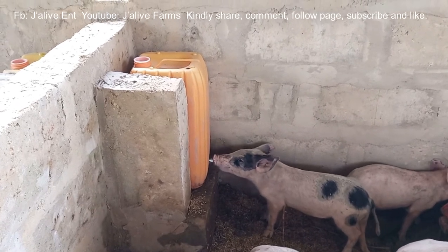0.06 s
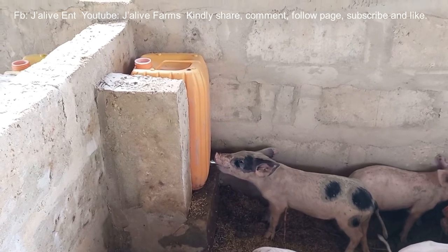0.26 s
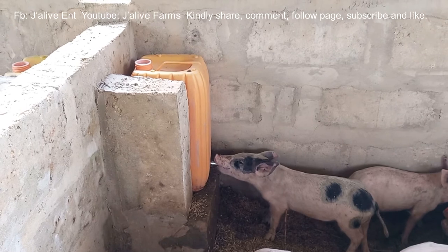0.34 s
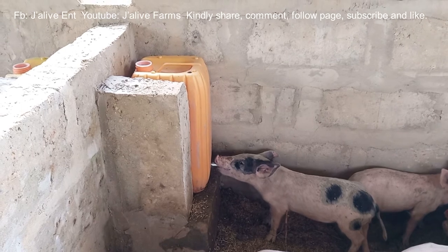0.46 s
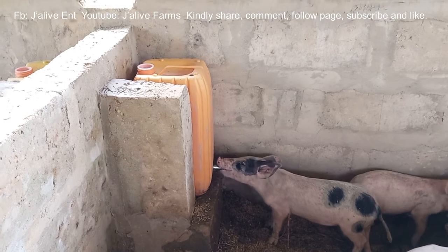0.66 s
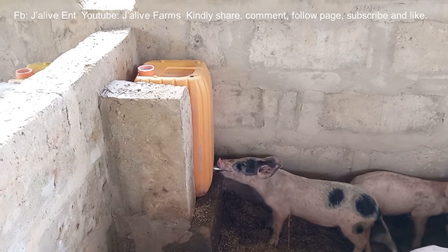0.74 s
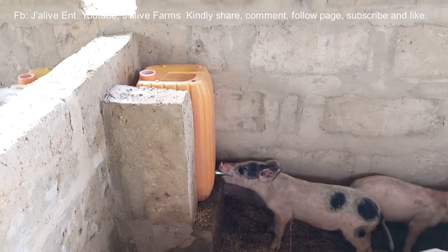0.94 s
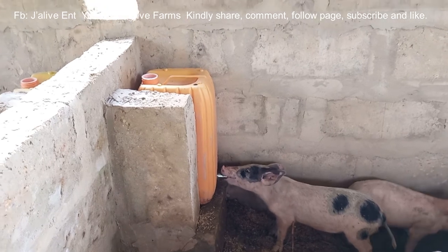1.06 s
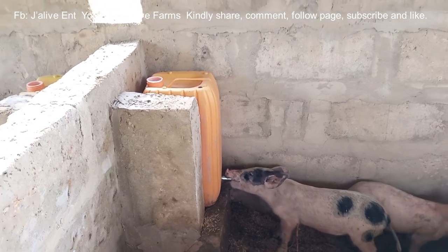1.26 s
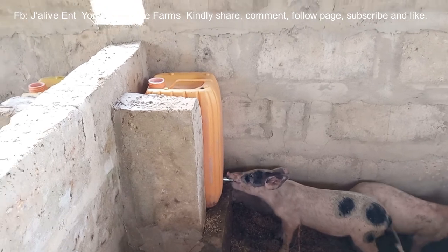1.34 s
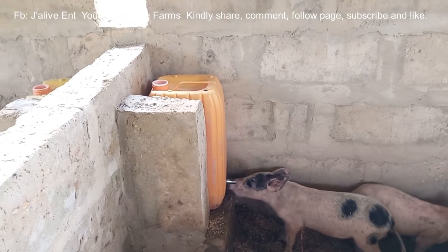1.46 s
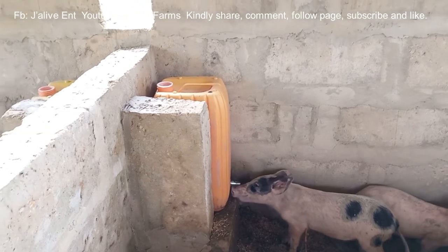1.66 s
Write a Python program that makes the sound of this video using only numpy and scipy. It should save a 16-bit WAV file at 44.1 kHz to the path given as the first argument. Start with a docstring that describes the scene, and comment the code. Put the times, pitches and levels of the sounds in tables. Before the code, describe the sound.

Pigs grunting and giving two harsh squeals, with faint wet hisses from a drinker.

```python
"""Pigs at a drinker in a small concrete pen, heard close on one small microphone, in quiet outdoor air.
Gruff throat grunts and closed-mouth hums come first, with a thin squeak and wet hisses from the drinker.
Two harsh squeals follow, near 0.45 s and 1.15 s, with more grunts and hisses around them. Each starts as
a rattling rasp of flapping throat tissue, breaks into a thinner falling tone of the vocal folds and ends
with a quick drop. The bare walls add a brief echo throughout."""
import sys
import numpy as np
from scipy import signal
from scipy.fft import rfft, irfft
from scipy.io import wavfile
from scipy.ndimage import uniform_filter1d

SR = 44100
rng = np.random.default_rng(int(sys.argv[2]) if len(sys.argv) > 2 else 0)


def bounce(signal):
    """Save signal as a 16-bit WAV file at the path given by the first command-line argument."""
    frames = np.transpose(np.atleast_2d(signal))
    limited = np.clip(frames, -1, 1)
    pcm = np.round(limited * 32767).astype(np.int16)
    wavfile.write(sys.argv[1], SR, pcm)


N = 74970


def undb(db):
    return 10 ** (np.asarray(db) / 20)


def clock():
    return np.arange(N) / SR


def noise():
    return rng.standard_normal(N)


def walk(rate_hz):
    """Smooth random wander with a spread of 1."""
    width = max(int(SR / rate_hz), 1)
    wander = uniform_filter1d(uniform_filter1d(noise(), width, mode="wrap"), width, mode="wrap")
    return wander / wander.std()


def curves(rows):
    """The columns of a control table over time, and a gate that is open while it lasts."""
    rows, t = np.array(rows, float), clock()
    gate = np.clip(np.minimum(t - rows[0, 0], rows[-1, 0] - t) / 0.0038 + 1, 0, 1)
    return [np.interp(t, rows[:, 0], column) for column in rows.T[1:]], gate


def response(hz, shape):
    """Gain at the given frequencies of a shape with columns freq_hz, gain_db."""
    freq_hz, gain_db = np.array(shape, float).T
    return undb(np.interp(np.log(hz + 1), np.log(freq_hz), gain_db))


def colour(x, shape, size=4096):
    """Minimum-phase filter of unit energy: the gains of the shape count only relative to each other."""
    cepstrum = irfft(np.log(response(np.arange(size // 2 + 1) * SR / size, shape)))
    cepstrum[1:size // 2] *= 2
    cepstrum[size // 2 + 1:] = 0
    impulse = irfft(np.exp(rfft(cepstrum)))
    return signal.fftconvolve(x, impulse / np.linalg.norm(impulse))[:N]


def ring(x, hz, q):
    """One resonance, gain 1 at its centre."""
    return signal.lfilter(*signal.iirpeak(hz, q, fs=SR), x)


def scatter(x, decay_s=0.0032, size=1024):
    """Spreads each slap over a few milliseconds and keeps its colour."""
    burst = rfft(rng.standard_normal(size) * np.exp(-np.arange(size) / SR / decay_s), 2 * size)
    burst /= np.sqrt(uniform_filter1d(np.abs(burst) ** 2, size=14))
    return signal.fftconvolve(x, irfft(burst)[:size])[:N]


def flaps(start_s, rate_hz, rough, jitter=0.11, shimmer_db=6.5):
    """Slaps of throat tissue and the puffs of air between them; roughness makes them uneven and airy."""
    rough = np.clip(rough, 0, 1)
    pulses, puff, at_s = np.zeros(N), np.zeros(N), max(start_s, 0)
    for late, loud in rng.standard_normal((200, 2)):
        i = int(at_s * SR)
        if i >= N:
            break
        period_s = np.exp(jitter * rough[i] * late) / rate_hz[i]
        strength = undb(shimmer_db * rough[i] * loud)
        pulses[i] = strength * np.sqrt(period_s * SR)
        cycles = np.arange(min(int(2 * period_s * SR), N - i)) / (period_s * SR)
        puff[i:i + len(cycles)] = strength * np.exp(-cycles) * np.sqrt(2)
        at_s += period_s
    breath = np.sqrt(rough) * noise() * np.sqrt((1 - rough) * puff ** 2 + rough)
    return np.sqrt(1 - rough) * pulses, breath


def outdoor_air(level_db=-77.5):
    """A faint, steady rush around the pen, strongest in the bass."""
    # spectrum of the air: freq_hz, gain_db
    spectrum = [(20, -19), (55, 5), (120, -2.5), (300, -11), (700, -15.5), (1500, -23.5), (4500, -19),
                (7000, -26), (8800, -37), (15000, -41.5)]
    return undb(level_db) * colour(noise(), spectrum)


def grunts(release_s=0.024, roughness=0.49, throat_db=4.5, snout_db=9, q=7.7):
    """Short bursts of uneven flaps through a dark throat and a hollow snout."""
    # grunts: start_s, swell_s, hold_s, drive_db, flap_rate_hz, throat_hz, snout_hz
    calls = [(-.02, 0.0067, 0.024, -58, 88, 254, 615), (0.191, 0.004, 0.062, -52.5, 72, 428, 584),
             (0.287, .005, 0.012, -45.5, 68, 290, 834), (0.316, 0.0045, 0.011, -49, 52, 170, 494),
             (.603, 0.00404, 0.011, -51, 41.6, 274, 603), (0.641, 0.0055, 0.021, -53.5, 65, 222, 797),
             (0.939, 0.0081, 0.031, -64, 88, 302, 468), (0.975, 0.0018, 0.02, -56, 101, 275, 772)]
    # the grunting throat: freq_hz, gain_db
    throat_shape = [(30, -33), (80, -18), (140, 5), (230, 1), (350, -2), (550, -6.5), (780, -7),
                    (950, -19.5), (1350, -14), (2000, -26.5), (4300, -28.5), (6500, -32.5), (9500, -62.5)]
    sound = np.zeros(N)
    for start_s, swell_s, hold_s, drive_db, rate_hz, throat_hz, snout_hz in calls:
        age = clock() - start_s
        effort = np.clip(age / swell_s, 0, 1) * np.exp(-np.maximum(age - swell_s - hold_s, 0) / release_s)
        pulses, breath = flaps(start_s + swell_s, np.full(N, rate_hz), np.full(N, roughness))
        voice = colour(undb(drive_db) * effort * (scatter(pulses) + breath), throat_shape)
        throat = undb(throat_db) * ring(voice, throat_hz, q)
        snout = undb(snout_db) * ring(voice, snout_hz, q)
        sound += (voice + throat + snout) / 2
    return sound


def hums(pitch_hz=136, sag_hz_per_s=96, octave_db=-19):
    """Soft low grunts with the mouth shut, sagging in pitch."""
    # closed-mouth hums: start_s, length_s, level_db
    calls = [(-.01, 0.045, -58.5), (0.035, 0.064, -66), (0.311, 0.086, -61.5), (0.736, 0.109, -60),
             (0.988, 0.11, -63.5), (1.066, 0.067, -71)]
    sound = np.zeros(N)
    for start_s, length_s, level_db in calls:
        age = np.clip(clock() - start_s, 0, length_s)
        hz = (pitch_hz - sag_hz_per_s * age) * (1 + 0.059 * walk(37))
        phase = 2 * np.pi * np.cumsum(hz) / SR
        swell = undb(level_db) * np.sqrt(2) * np.sin(np.pi * age / length_s) ** 2
        sound += swell * (np.sin(phase) + undb(octave_db) * np.sin(2 * phase))
    return sound


def squeak(rise_hz_per_s=460, blur_rad=0.68, brighten=0.22):
    """A thin, hoarse vibration, higher than the squeals, that rises a little and brightens as it swells."""
    # the squeak: start_s, swell_s, fade_s, pitch_hz, level_db
    calls = [(0.041, 0.036, 0.038, 1054, -77.5)]
    # weight of its harmonics: freq_hz, gain_db
    spectrum = [(1100, 0), (2250, -4), (3400, 0), (4550, -0.5), (5700, -24), (6800, -24), (8000, -36)]
    start_s, swell_s, fade_s, pitch_hz, level_db = calls[0]
    age = np.clip(clock() - start_s, 0, swell_s + fade_s)
    ramp = np.clip(np.minimum(age / swell_s, (swell_s + fade_s - age) / fade_s), 0, 1)
    effort = np.sin(np.pi / 2 * ramp)
    phase = 2 * np.pi * np.cumsum(pitch_hz + rise_hz_per_s * age) / SR + blur_rad * walk(310)
    sound = np.zeros(N)
    for k in range(1, 8):
        gain = response(k * pitch_hz, spectrum) * effort ** (1 + brighten * k * k)
        sound += gain * undb(2 * walk(230)) * np.sin(k * phase)
    return undb(level_db) * sound


def drinker_hisses(rise_s=0.0022, relative_width=0.52, grain_db=5, top_hz=7600):
    """Grainy spurts of water and air that die away."""
    # spurts at the drinker: peak_s, level_db, centre_hz, decay_s
    spurts = [(0.182, -63.5, 1320, 0.062), (0.22, -63, 3610, 0.011), (0.314, -66, 2830, 0.05),
              (0.33, -61.5, 4600, 0.019), (0.938, -71, 1130, 0.0046), (1.245, -53, 1456, 0.0015),
              (1.447, -50.5, 3220, 0.0019), (1.569, -58, 4475, 0.0047), (1.681, -70, 5400, 0.03)]
    hz = np.geomspace(100, 16000, 40)
    rolloff_db = -20 * np.log10(1 + (hz / top_hz) ** 20)
    sound = np.zeros(N)
    for peak_s, level_db, centre_hz, decay_s in spurts:
        age = clock() - peak_s
        flow = np.exp(np.minimum(age / rise_s, -age / decay_s)) * undb(grain_db * walk(380))
        band_db = -20 * np.log10(1 + ((hz / centre_hz - centre_hz / hz) / relative_width) ** 2)
        sound += colour(undb(level_db) * flow * noise(), np.column_stack([hz, band_db + rolloff_db]))
    return sound


def squeal_tones(waver=0.003, flutter=0.006, fray_db=3.5, fray_rad=0.25, flicker_db=4.5):
    """Fluttering folds whose period doubles under strain, adding lines halfway between the harmonics."""
    # the folds, one list per squeal: time_s, pitch_hz, fundamental_db, octave_below_db, overtones_db
    calls = [
        [(.432, 679.4, -100, -84, -100), (.458, 683, -88, -50, -72.5), (.495, 666, -90, -48.5, -61),
         (.55, 612.8, -81, -62.5, -51.5), (.58, 636.3, -64, -62, -55.5), (.614, 631, -72, -56, -50.5),
         (.632, 611, -65, -70, -59), (.676, 598.4, -63, -93, -65.5), (.708, 601.5, -70.5, -92, -57.5),
         (.735, 534.4, -56, -71, -70.5), (.79, 493, -59, -103, -71), (.818, 531, -60, -80, -70),
         (.831, 370, -49.5, -95, -96), (.85, 340, -91, -100, -100)],
        [(1.143, 687.8, -100, -96.5, -100), (1.161, 667.5, -102, -46.5, -80.5), (1.215, 652.5, -63.5, -62, -67),
         (1.238, 551.6, -49.5, -50.5, -68), (1.272, 566, -53, -48, -57.5), (1.288, 574, -69, -56, -67),
         (1.3, 742, -58, -60.5, -62), (1.338, 740.2, -73, -47, -51.5), (1.368, 780.3, -54.5, -54, -57.5),
         (1.395, 753.5, -63.5, -66.5, -62), (1.43, 709.4, -65, -61.5, -65.5), (1.475, 703.8, -68, -101, -67.5),
         (1.53, 687.4, -71.5, -105, -74.5), (1.59, 607.3, -63.5, -89, -71), (1.636, 629, -72.5, -83, -80.5),
         (1.651, 481.6, -59, -59.5, -80), (1.669, 380, -55.5, -87, -91), (1.7, 323, -80, -89, -90)],
    ]
    # mouth shape, one list per squeal: freq_hz, gain_db
    mouths = [
        [(600, -29), (920, 13), (1220, 3), (1540, 3), (1850, -14.5), (2420, 7.5), (2850, 7.5), (3120, 2.5),
         (3700, -4.5), (4400, -11), (4900, 4.5), (5350, -4.5), (6000, 6), (6600, -1.5), (7400, -6), (8400, -42)],
        [(600, -10), (850, 12), (1110, 13.5), (1200, 4.5), (1480, -3.5), (1850, -12), (2250, 9.5), (2600, 7),
         (2950, -15), (3330, 4.5), (3750, -1), (4200, -21), (4630, 10.5), (5200, -19), (5700, 7), (6400, -4),
         (7400, -9.5), (8400, -39.5)],
    ]
    # overtones are clear at a squeal's height and hoarse as it fades: time_s, blur_rad_per_harmonic
    hoarseness = [(.5, .12), (.6, .08), (.65, .2), (.7, .14), (.8, .3), (1.25, .2), (1.31, .06), (1.38, .1),
                  (1.46, .45)]
    # brightness of the overtones: time_s, tilt_db_per_octave
    brightness = [(.5, -2.5), (.6, 4), (.68, -4), (1.27, -0.5), (1.32, -0.5), (1.37, 4.5), (1.5, -7)]
    (hoarse_rad,), _ = curves(hoarseness)
    (tilt_db,), _ = curves(brightness)
    sound = np.zeros(N)
    for call, mouth in zip(calls, mouths):
        (pitch_hz, fundamental_db, under_db, overtones_db), gate = curves(call)
        hz = pitch_hz * (1 + waver * walk(96) + flutter * walk(940))
        phase = 2 * np.pi * np.cumsum(hz) / SR
        fundamental = undb(fundamental_db + fray_db * walk(190)) * np.sin(phase + fray_rad * walk(230))
        undertone = undb(under_db + 1.4 * walk(200)) * np.sin(phase / 2)
        half_line_gain = undb(0.5) * undb(under_db) / (undb(under_db) + undb(fundamental_db))
        overtones, power = 0, 0
        for k in np.arange(1.5, 12, 0.5):
            gain = response(k * hz, mouth) * undb(tilt_db * np.log2(k)) * (half_line_gain if k % 1 else 1)
            blur = hoarse_rad * (k - 1) * walk(560) + 2 * np.pi * rng.random()
            overtones += gain * undb(flicker_db * walk(100)) * np.sin(k * phase + blur)
            power += gain ** 2
        overtones *= undb(overtones_db) / np.sqrt(power)
        sound += np.sqrt(2) * gate * (fundamental + undertone + overtones)
    return sound


def squeal_rasps():
    """The harsh part of each squeal: flaps ring chest, mouth and the high snout resonances."""
    # the rasp, one list per squeal: time_s, flap_rate_hz, chest_db, mouth_db, snout_db, roughness
    calls = [
        [(.453, 89.2, -83.5, -82, -76, 0), (.465, 83.4, -56, -54.5, -61.5, 0.11),
         (.479, 86.5, -57, -53, -57.5, 0.08), (.489, 111, -40, -45, -52.5, 0.11),
         (.503, 100.3, -46.5, -50.5, -47, 0.03), (.516, 65.2, -43, -48.5, -44, .6),
         (.55, 110, -47.5, -52, -48, 0.8), (.605, 87, -62.5, -64, -50.5, 0.43),
         (.645, 115, -60, -102, -82, 1.08), (.72, 96, -68.5, -68, -70, 0.6), (.82, 165, -78, -76, -75.5, 0.6),
         (.86, 240, -75, -100, -103, 0.2)],
        [(1.148, 73.4, -81, -102, -86, 0.36), (1.16, 72.2, -55, -70, -69, 0.18),
         (1.212, 105, -47.5, -62, -73, 0.33), (1.221, 75, -43.5, -59.5, -61, 0.29),
         (1.238, 103.6, -41.5, -62, -48, 0.63), (1.264, 142, -52, -58, -55.5, 0.71),
         (1.295, 84.6, -53.5, -62, -64.5, 0.35), (1.35, 77, -76, -92, -70.5, 0.67),
         (1.42, 105, -65.5, -69, -60.5, 0.42), (1.48, 138, -79.5, -78, -81, 0.72),
         (1.6, 107, -77.5, -91, -81.5, 0.87), (1.7, 136, -70.5, -99, -76, 0.37)],
    ]
    # chest resonances: freq_hz, gain_db
    chest_shape = [(30, -29), (80, -20.5), (150, -9), (220, -12), (330, 2.5), (450, -12.5), (560, -9.5),
                   (720, -29.5), (1100, -19), (2500, -83.5)]
    # mouth resonances: freq_hz, gain_db
    mouth_shape = [(300, -55), (740, -18.5), (900, 9.5), (1020, 7.5), (1180, 4), (1380, -16), (1800, -28.5),
                   (4000, -66.5)]
    # high snout resonances, one list per squeal: freq_hz, gain_db
    snout_shapes = [
        [(900, -53.5), (1750, -28), (2050, -3.5), (2400, -11), (2850, 4), (3200, -18), (3650, 1.5), (4050, -1),
         (4400, -6), (4780, 5.5), (5250, -7), (5600, 1.5), (6300, -1.5), (6950, -20.5), (7550, -13),
         (8300, -32.5), (9500, -67)],
        [(900, -37), (1400, -17.5), (1850, -13), (2250, -9), (2600, -0.5), (3000, -17.5), (3400, -3),
         (3800, -3.5), (4600, 2), (5100, -8.5), (5650, -1.5), (6400, -12.5), (7000, -19.5), (7700, -12),
         (8400, -44.5), (9500, -53.5)],
    ]
    sound = np.zeros(N)
    for call, snout_shape in zip(calls, snout_shapes):
        (rate_hz, chest_db, mouth_db, snout_db, roughness), gate = curves(call)
        pulses, breath = flaps(call[0][0], rate_hz, roughness)
        drive, snout_gain = gate * (pulses + breath), gate * undb(snout_db)
        sound += colour(drive * undb(chest_db), chest_shape)
        sound += colour(drive * undb(mouth_db), mouth_shape)
        sound += colour(scatter(snout_gain * pulses) + snout_gain * breath, snout_shape)
    return sound


def hard_slaps(rise_s=0.00028, decay_s=0.0013):
    """The hardest flaps, where a squeal breaks out, bite through the high snout resonances."""
    # single hard flaps: peak_s, level_db
    hits = [(0.468, -45), (0.4898, -32.5), (0.4989, -26), (0.5087, -33.5), (1.2194, -43.5), (1.2375, -39)]
    # snout resonances they ring: freq_hz, gain_db
    snout_shape = [(1800, -31.5), (2800, -9), (3150, -27.5), (3600, -1), (4050, 4), (4350, -10), (4770, 5),
                   (5280, -16), (5570, -1), (5850, -9.5), (6250, -11.5), (8000, -26.5), (10500, -71)]
    force = np.zeros(N)
    for peak_s, level_db in hits:
        age = clock() - peak_s
        force += undb(level_db) * np.exp(np.minimum(age / rise_s, -age / decay_s))
    return colour(force * noise(), snout_shape)


def drinker_tick(peak_s=1.1298, level_db=-67, decay_s=0.00077):
    """One tiny bright click just ahead of the second squeal."""
    spectrum = [(500, -27), (2000, 6.5), (7000, -1), (9000, -22)]  # freq_hz, gain_db
    envelope = undb(level_db) * np.exp(-np.abs(clock() - peak_s) / decay_s)
    return colour(envelope * noise(), spectrum)


def pen(x, t60_s=0.071, echo_db=-6.5, low_cut_hz=433, first_echo_s=0.0056, mode_q=32):
    """Close concrete walls: a short dense echo, thin in the bass, and a few standing waves that ring on."""
    # standing waves between the walls: freq_hz, gain_db
    modes = [(330, -10), (380, -10.5), (549, -10.5), (850, -11)]
    t = clock()
    tail = noise() * undb(-60 * t / t60_s) * (t > first_echo_s)
    low_cut = signal.butter(1, low_cut_hz, "high", fs=SR, output="sos")
    tail = signal.sosfilt(low_cut, tail / np.linalg.norm(tail))
    standing = sum(undb(db) * ring(x, hz, mode_q) for hz, db in modes)
    return x + undb(echo_db) * signal.fftconvolve(x, tail)[:N] + standing


def scene():
    """Pigs and drinker inside the pen, over quiet outdoor air, in mono."""
    high_calls = squeal_rasps() + squeal_tones() + squeak()
    low_calls = grunts() + hums()
    drinker = drinker_hisses() + drinker_tick()
    air = outdoor_air()
    return (pen(high_calls + hard_slaps() + low_calls + drinker) + air)[None]


def record(dry):
    """The small microphone loses the deep bass; the recorder cuts the top."""
    low_hz, top_hz = 41.7, 15650
    microphone = signal.butter(3, low_hz, "high", fs=SR, output="sos")
    recorder = signal.ellip(8, 0.2, 70, top_hz, fs=SR, output="sos")
    return signal.sosfilt(recorder, signal.sosfilt(microphone, dry))


dry = scene()
out = record(dry)
bounce(out)
```